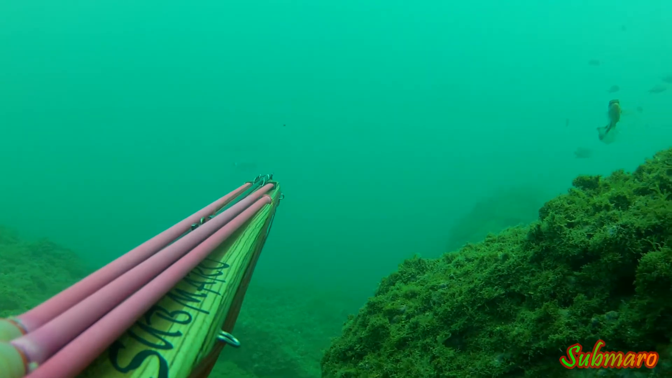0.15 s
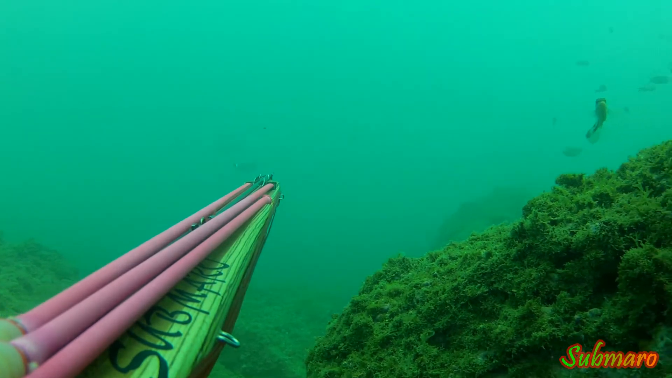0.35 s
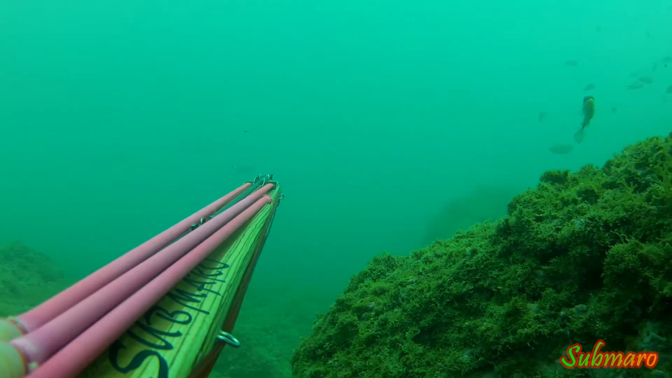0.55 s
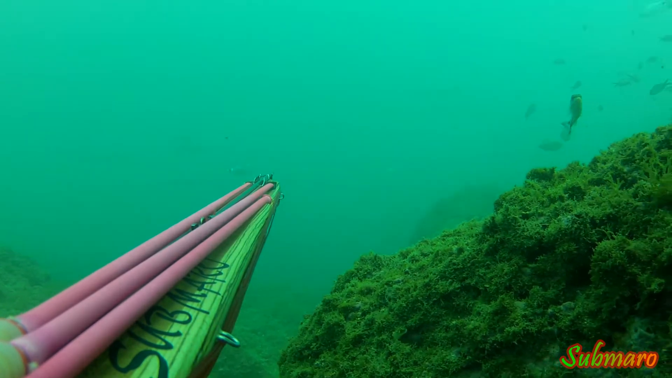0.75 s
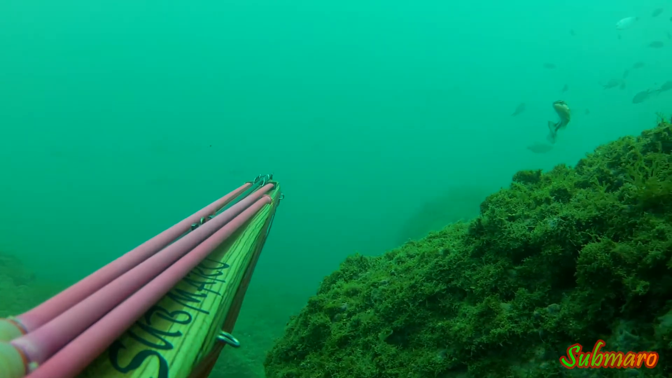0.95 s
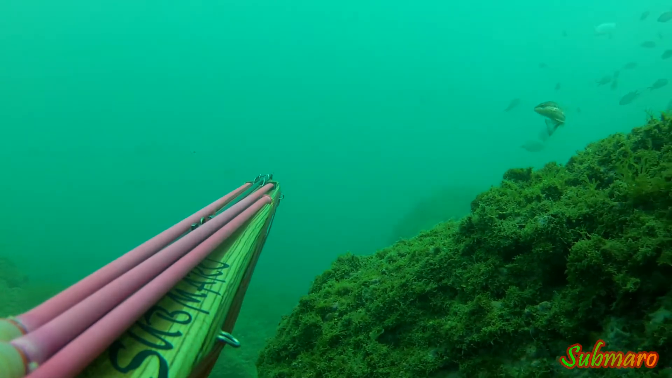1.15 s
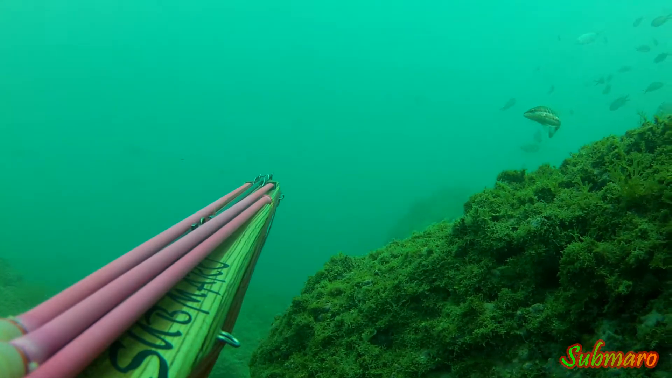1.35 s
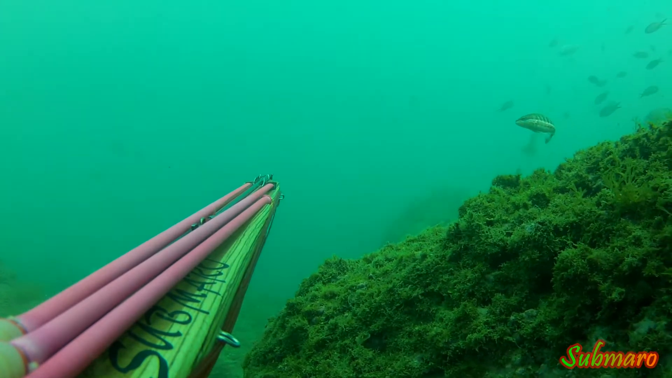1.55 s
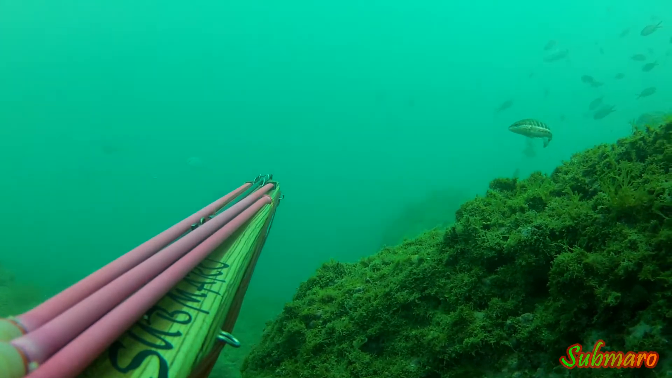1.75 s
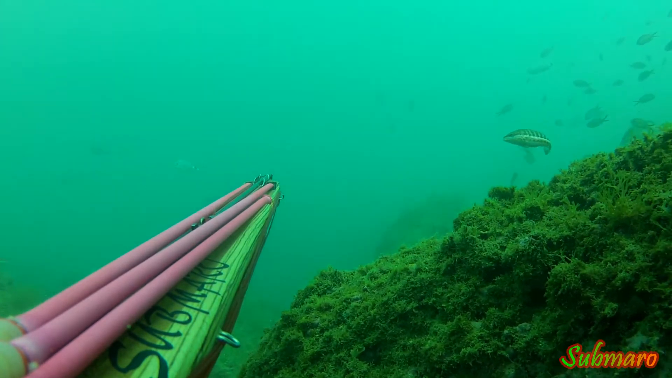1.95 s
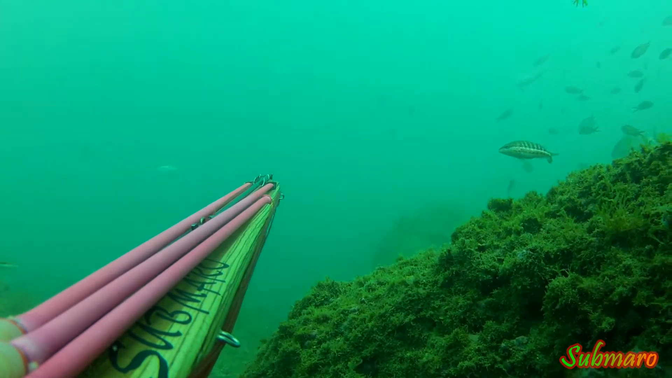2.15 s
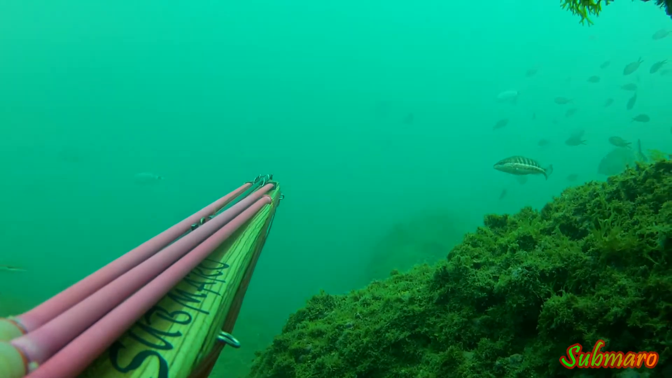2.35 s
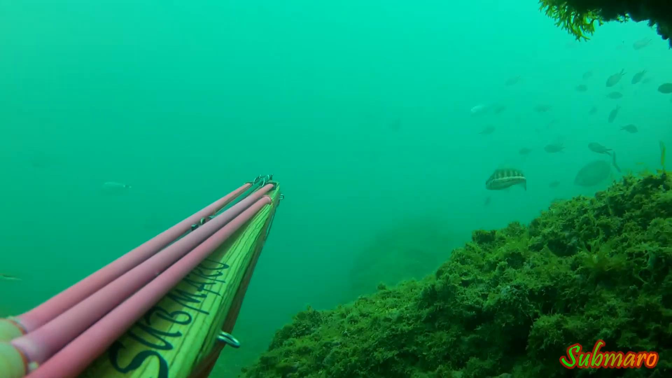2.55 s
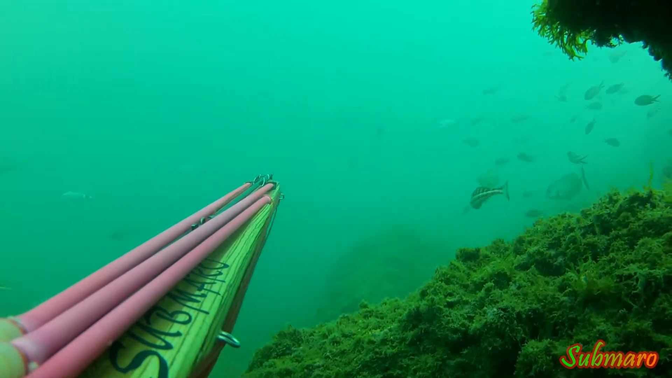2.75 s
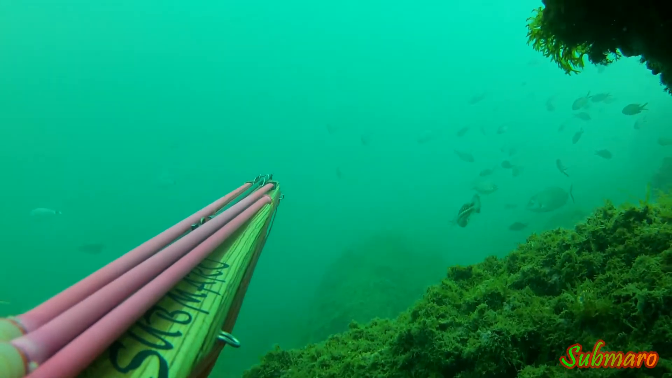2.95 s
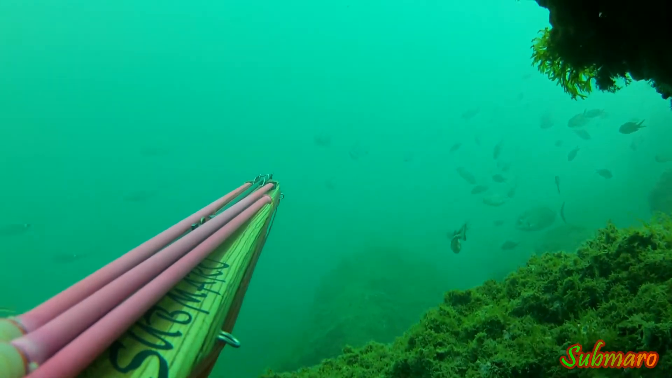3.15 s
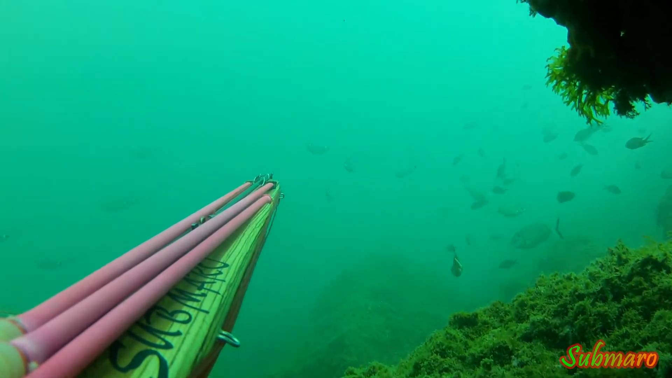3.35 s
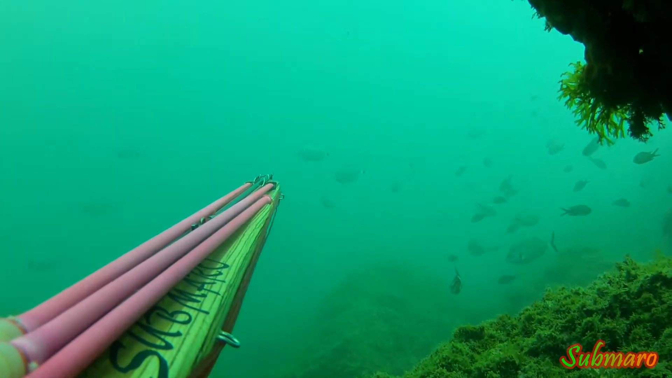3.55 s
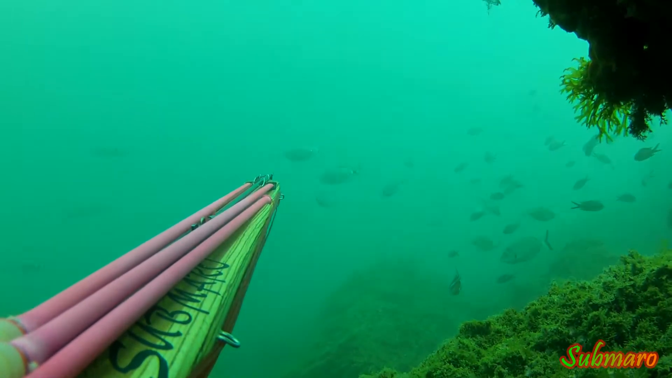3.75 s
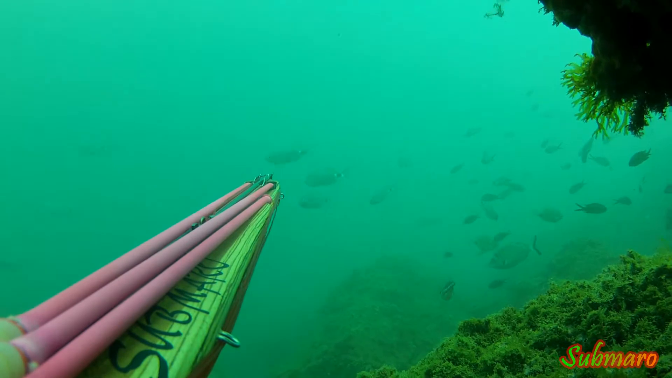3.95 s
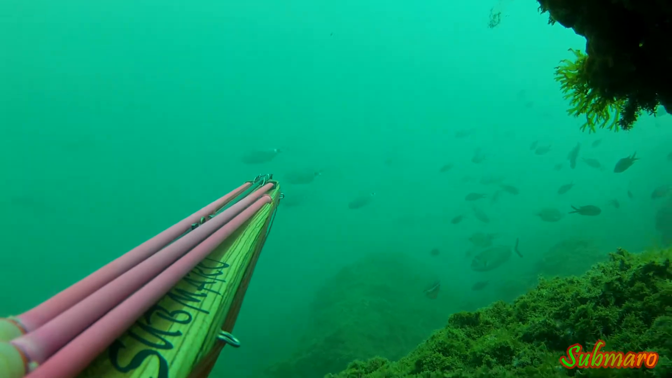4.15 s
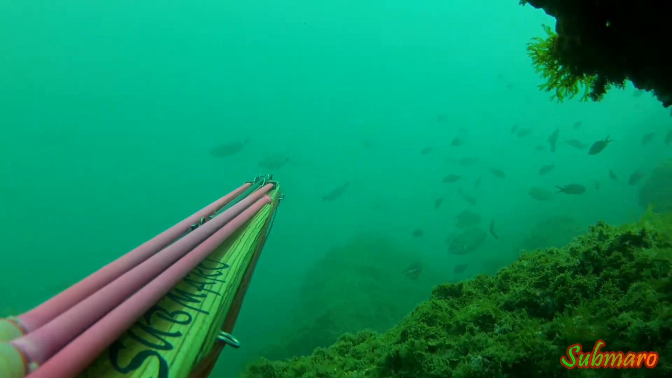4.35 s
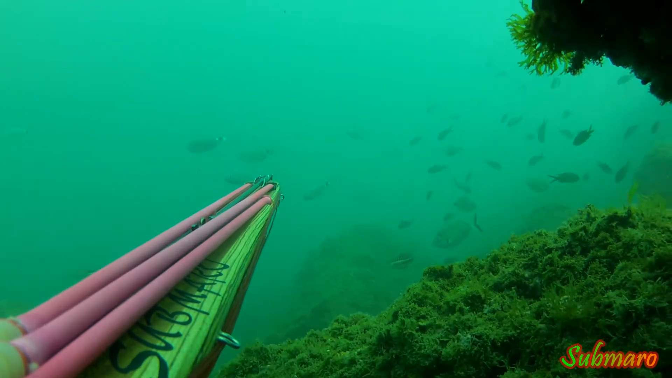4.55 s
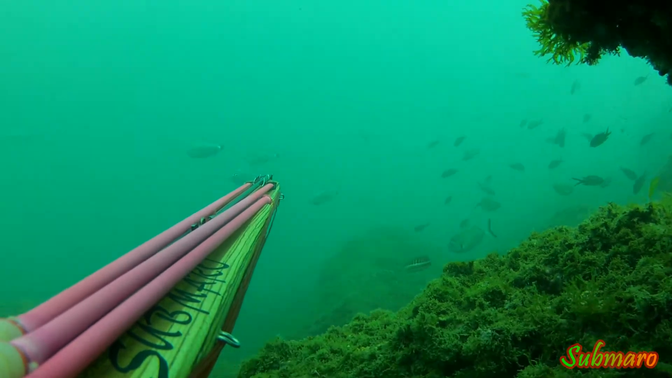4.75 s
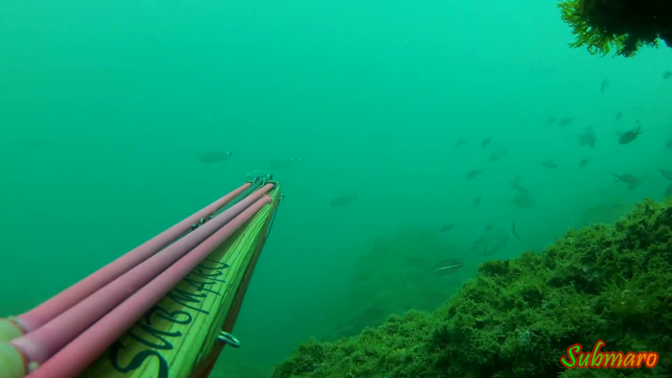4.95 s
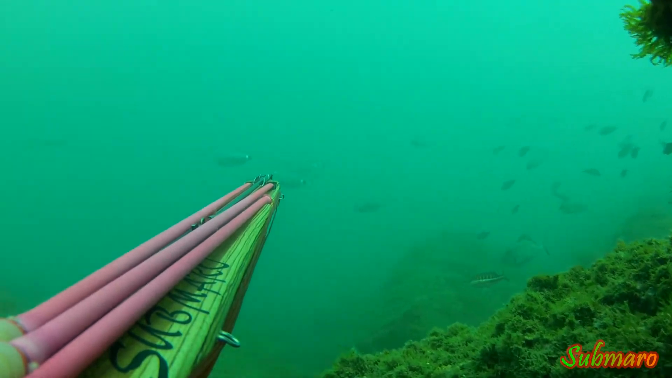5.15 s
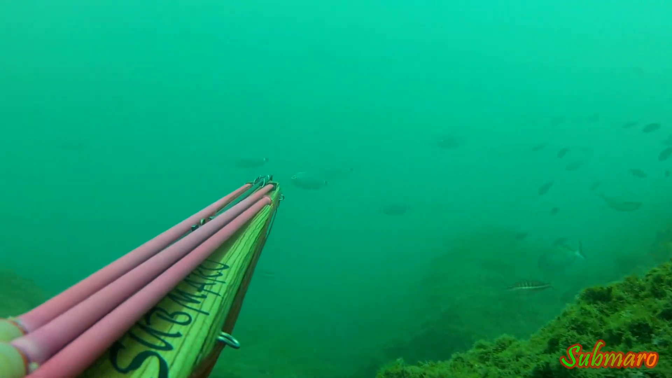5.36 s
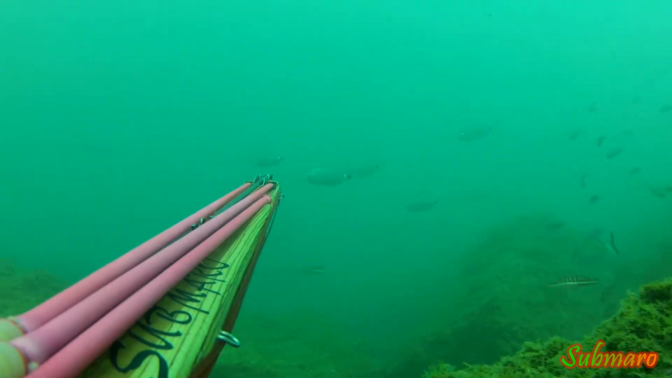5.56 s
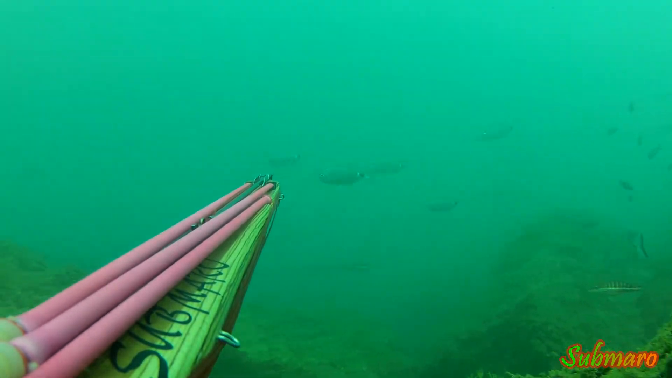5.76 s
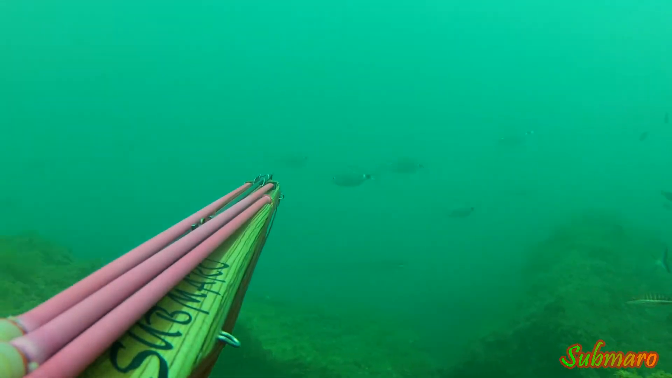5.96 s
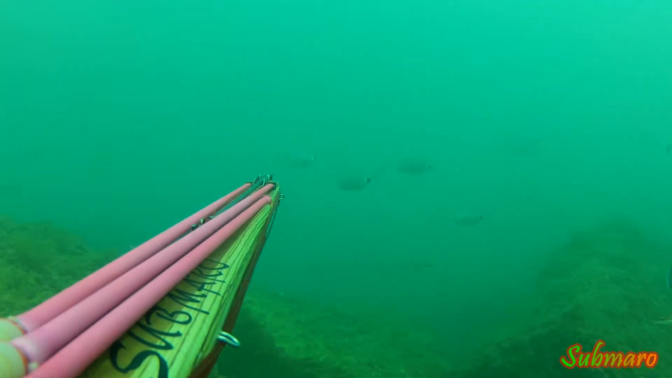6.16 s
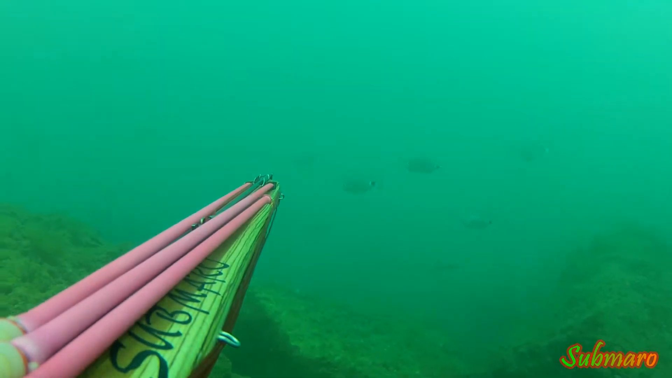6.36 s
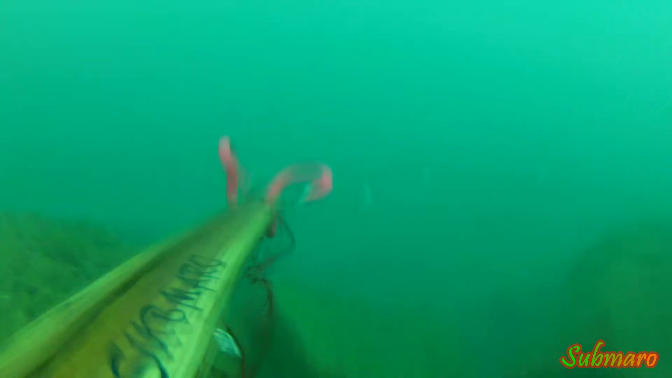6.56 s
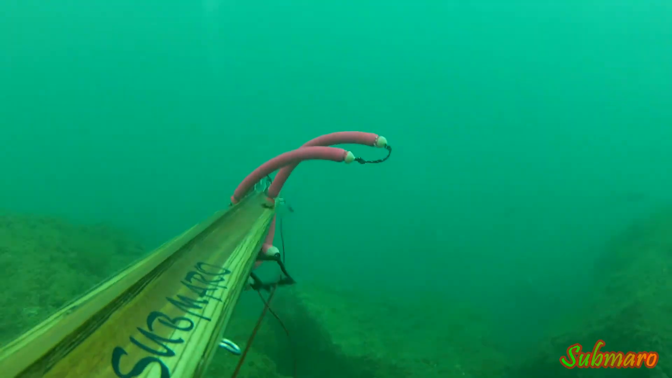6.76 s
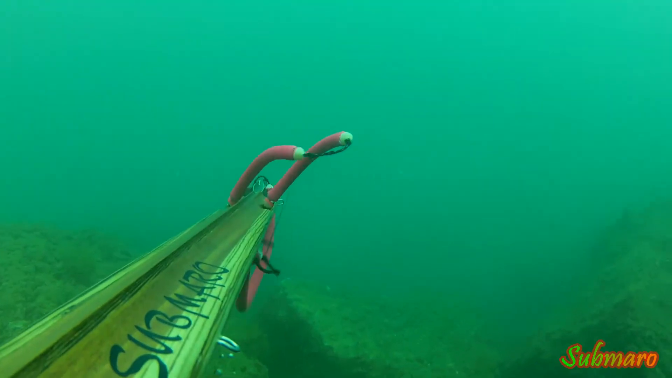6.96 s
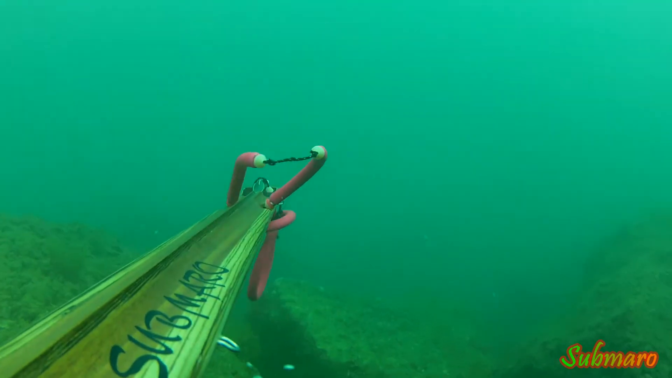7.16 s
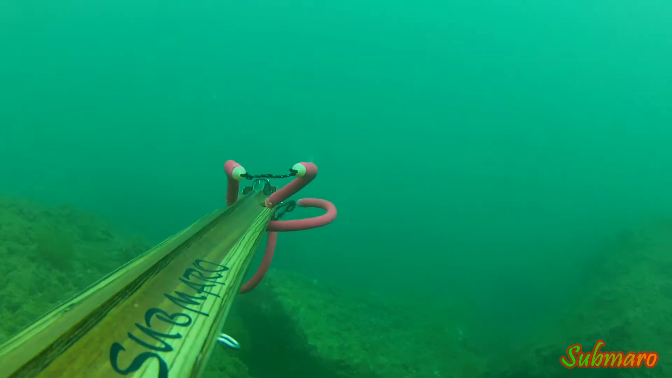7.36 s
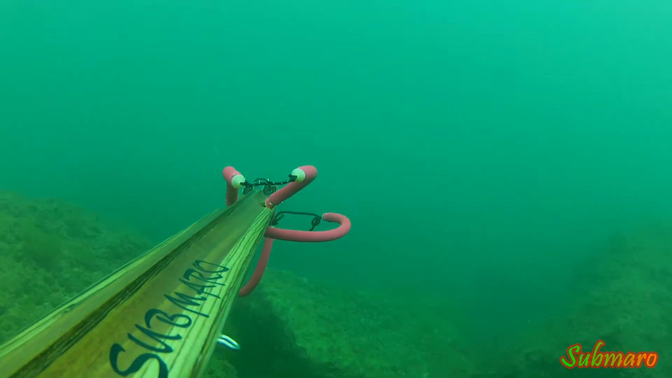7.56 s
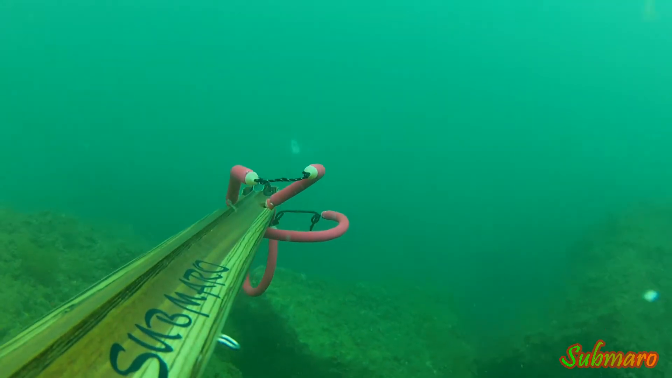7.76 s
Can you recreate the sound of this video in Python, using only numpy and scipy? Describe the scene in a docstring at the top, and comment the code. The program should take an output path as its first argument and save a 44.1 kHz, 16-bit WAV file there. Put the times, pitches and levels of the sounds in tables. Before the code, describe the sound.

A quiet underwater reef, heard through a waterproof camera housing close to a speargun. A faint dull hiss and slow low surge carry sparse, dry shrimp crackle. At about 1.9 s one very close snap cracks sharply with a tiny double edge. From 2.3 s soft hollow knocks, faint gurgling and small bubble blips touch the housing, notably around 2.3-2.7, 3.4 and 4.6 s, with weaker taps near 5.2 and 5.7 s. At 6.5 s the speargun fires: an abrupt, very loud, gritty bang with a split-second screech and deep thump. Bands and line clatter rapidly until about 6.9 s over churning water and scraping. From 6.95 to 7.25 s the housing drums and rubs, bubbles shake loose and a strong clack lands near 7.2 s. It drops away quickly, leaving a brief light rattle at 7.3 s, a low thump near 7.6 s and small ticks, bubbles and a slight shift to the end.

```python
"""Under water on a reef, a speargun is fired beside a camera in a waterproof housing.
Shrimp snap (filtered noise bursts) and the housing knocks (damped modes), softly during the wait and
strongly at the shot. The spear screeches off its rail (a noisy tone), the gun kicks, bands and line rattle
on the barrel (blows on damped modes), and churning water rubs and drums on the housing (shaped noise and
random grains). Thumps and bubbles are short swelling sines."""
import sys
import numpy as np
from scipy import signal
from scipy.fft import rfft, irfft, next_fast_len
from scipy.io import wavfile
from scipy.ndimage import uniform_filter1d

SR = 44100
rng = np.random.default_rng(int(sys.argv[2]) if len(sys.argv) > 2 else 0)


def output_pcm(signal):
    """Save a mono or channel-first signal as 16-bit PCM at the path in sys.argv[1].

    Samples are clipped to [-1, 1] before scaling.
    """
    pcm = np.clip(np.atleast_2d(signal).T, -1, 1) * 32767
    wavfile.write(sys.argv[1], SR, np.round(pcm).astype(np.int16))


N = 343980
T = np.arange(N) / SR  # time, s

# All levels are those of the dry sound, ahead of record().
# spectrum of the quiet sea's hiss: [f/Hz, relative density level/dB]
SEA_SPECTRUM = [(12, -31), (20, -1), (60, 0), (152, -3), (310, -6.5), (599, -14.5), (650, -16.5),
                (4310, -23.5), (5220, -27.5), (5990, -35.5), (6860, -26.5), (9280, -31), (10900, -36.5),
                (11900, -51.5), (14000, -53)]
SEA_DB = -62.5  # rms level of the hiss
# slow low surge, before a 3.5 dB cut and a random waver: [t/s, level/dB]
SURGE_LEVEL = [(0, -69), (1.8, -65.5), (2.4, -59.5), (3.9, -62), (5.7, -58), (7.8, -59.5)]
# spectrum of the surge: [f/Hz, gain/dB]
SURGE_SPECTRUM = [(12, -5.5), (35, 4), (120, -3.5), (230, -6.5), (400, -11), (900, -20.5), (3000, -49.5)]

# nearest snapping shrimp: [t/s, level over 10 ms/dB, favoured f/Hz, burst time/s]
NEAR_SNAPS = [(0.3219, -52.5, 1980, 0.0015), (0.781, -61, 5600, 0.0017), (0.902, -59, 5200, 0.0015),
              (1.3333, -55.5, 4200, 0.0015), (1.6673, -46.5, 1680, 0.0081), (1.7061, -54.5, 1920, 0.0022),
              (1.825, -55.5, 5370, 0.00065), (2.0676, -50, 3520, 0.00025), (2.2221, -50, 2410, 0.0047),
              (2.8485, -56.5, 3050, .0034), (3.0965, -53.5, 3030, .0008), (3.111, -51, 3480, 0.0017),
              (3.3485, -55.5, 3960, 0.00021), (3.7046, -49.5, 1540, 0.0042), (4.4283, -56.5, 2360, 0.0017),
              (4.6311, -49.5, 2100, 0.00089), (5.565, -54, 2340, 0.0037), (5.761, -57.5, 4880, 0.0011),
              (6.0213, -47, 3260, .0015)]
# spectra of a near snap, of the far snaps and of one very close crack: [f/Hz, gain/dB]
SNAP_SPECTRUM = [(100, -29), (500, -10.5), (1000, 4), (1400, -5), (2000, 2), (3300, -3), (5000, -4.5),
                 (7200, -2), (10000, -6), (11500, -23), (16000, -43.5)]
FAR_SPECTRUM = [(100, -29.5), (1000, -8.5), (2000, -1), (3500, -9), (5000, -1), (7300, -6.5), (8500, -15.5),
                (10300, -10.5), (11500, -26), (16000, -47)]
CRACK_SPECTRUM = [(100, -26.5), (500, -20.5), (780, -19), (1020, -5), (1400, -2), (2100, -3.5), (2750, 2.5),
                  (3700, 0), (4600, -11), (7200, -18.5), (8500, -8.5), (10500, -25), (12000, -43.5),
                  (14700, -12.5), (16000, -41)]
# fainter shrimp at random: level over 10 ms and its spread (dB), favoured range (Hz), burst time (s)
FAINT_SNAP_DB, FAINT_SNAP_SPREAD_DB, FAINT_SNAP_HZ, FAINT_SNAP_S = -64, 3.5, (1910, 4500), 0.0025

# damped modes of the gun and of the camera housing: [f/Hz, bandwidth/Hz, relative level/dB]
GUN_MODES = [(211, 95, 2.5), (394, 82, 1), (504, 26, 3.5), (632, 91, -3.5), (956, 119, 2), (1272, 75, -7),
             (1412, 120, -10), (1692, 148, -5.5), (1903, 180, -3), (2344, 360, -5.5), (2640, 600, -9.5),
             (3306, 510, -10.5), (4470, 1000, -21.5), (8100, 2600, -22)]
HOUSING_MODES = [(169, 40, -8.5), (213.7, 22.6, 4.5), (427, 35, -13), (628.4, 36, -4.5), (883, 52, -12),
                 (1065, 79, -16), (1525, 420, -27.5), (2200, 460, -31.5), (2960, 460, -35.5)]

# low thumps, one under the close crack, most others at the shot and gun movements:
# [t/s, peak level/dB, f/Hz, decay time/s]
LOW_THUMPS = [(1.878, -38.5, 45, 0.0086), (2.081, -45, 98, 0.0072), (6.4919, -3, 325, 0.0048),
              (6.496, -3.5, 103, 0.006), (6.53, -26, 83, 0.025), (6.559, -17, 149, 0.012),
              (6.568, -22, 60, 0.014), (6.637, -27, 86, 0.018), (6.797, -30.5, 69, 0.0086),
              (7.572, -36.5, 94, 0.0081)]
# small air bubbles: [t/s, peak level/dB, f/Hz, decay time/s]
LONE_BUBBLES = [(2.518, -49.5, 550, 0.019), (3.361, -48, 664, 0.021), (4.590, -46.5, 623, 0.02),
                (7.549, -44, 377, 0.0066), (7.753, -43, 296, 0.026)]
# knocks and glugs on the housing, soft during the wait and strong at the shot:
# [t/s, level over 10 ms/dB, favoured f/Hz, contact time/s]
HOUSING_KNOCKS = [(2.289, -41, 300, 0.0026), (2.315, -58, 600, .0048), (2.481, -51.5, 1230, 0.0035),
                  (2.588, -45, 920, 0.0093), (2.697, -51.5, 1000, 0.0065), (3.3605, -45, 790, 0.0034),
                  (4.543, -47, 1900, 0.0077), (4.555, -37, 940, 0.0021), (4.592, -45, 826, 0.012),
                  (5.225, -54.5, 393, .016), (5.650, -45.5, 398, 0.0088), (6.305, -55.5, 704, 0.0064),
                  (6.495, -8.5, 215, 0.0011), (6.559, -14.5, 221, 0.0061), (7.038, -24.5, 169, 0.014),
                  (7.093, -24, 390, .012), (7.12, -25.5, 440, .012), (7.19, -19.5, 190, 0.0058),
                  (7.218, -23, 190, 0.0045)]
# water sloshes back after a knock: delay range (s), level re the knock (dB), fading (dB/s), contact time (s)
SLOSH_DELAY_S, SLOSH_DB, SLOSH_FADE_DB_PER_S, SLOSH_CONTACT_S = (0.016, 0.14), -15, 61, 0.0079

# the diver creeps along the reef and water gurgles round the housing: [start t/s, length/s, level/dB]
CREEPING = [(2.538, 0.39, -63.5), (4.9, 0.77, -66.5)]
GURGLE_HZ = 710

# spear, bands and line strike the gun: [t/s, level over 10 ms before echoes/dB, favoured f/Hz]
GUN_STRIKES = [(6.4924, -10, 1710), (6.4971, -11, 1700), (6.518, -19, 910), (6.527, -11.5, 620),
               (6.5632, -24.5, 2100), (6.5775, -26, 1690), (6.6027, -29, 2360), (6.619, -28, 1260),
               (6.63, -30.5, 1520), (6.648, -29.5, 1400), (6.661, -30.5, 1670), (6.676, -23, 1600),
               (6.6937, -22.5, 1720), (6.7445, -19.5, 1110), (6.7733, -22.5, 910), (6.795, -27, 910),
               (6.824, -30, 1410), (6.853, -25, 1040), (6.998, -31.5, 970), (7.058, -35.5, 1350),
               (7.183, -22, 705), (7.188, -20.5, 1540), (7.189, -15, 950), (7.3083, -40, 890),
               (7.4208, -43.5, 920), (7.4989, -49.5, 2010), (7.6482, -32.5, 2900), (7.7107, -43.5, 1280),
               (7.7436, -38.5, 1540)]
CONTACT_CYCLES = 3.63  # a contact lasts this many cycles of its favoured pitch
# loose line and bands chatter: [start t/s, end t/s, central level over 10 ms before echoes/dB, central f/Hz]
CHATTER = [(6.513, 6.738, -35.5, 1490), (6.761, 6.88, -39, 1100), (7.327, 7.364, -38, 786)]
RATTLE_GAP_S, RATTLE_JITTER_S, RATTLE_SPREAD_DB, RATTLE_SPREAD_OCTAVES = 0.019, 0.006, 9.5, 0.52

# the gun recoils, is lowered, then shifts in the hand:
# [start t/s, length/s, starting level of rubbing on the housing/dB, starting level of line scraping/dB]
GUN_MOVES = [(6.498, 0.26, -40, -33), (6.959, 0.22, -30, -42), (7.73, .055, -57, -54)]
MOVE_RISE_DB_PER_S, MOVE_FALL_DB_PER_S = 551.5, 107.5
RUB_GROWTH_DB_PER_S, SCRAPE_FADE_DB_PER_S = 19, 54.5  # the grip tightens, the line goes slack

# each swing of the gun stirs up eddies: [t/s, peak level/dB]
EDDY_PEAKS = [(6.53, -26.5), (6.78, -34.5), (7.14, -37.5), (7.21, -38.5), (7.568, -48)]
EDDY_RISE_DB_PER_S, EDDY_FALL_DB_PER_S = 333, 69.5
# spectrum of turbulence: [f/Hz, gain/dB]
TURBULENCE_SPECTRUM = [(12, -9.5), (35, -0.5), (90, -5), (150, -9), (300, -15), (800, -52.5),
                       (3000, -102.5)]

# lowering the gun shakes bubbles loose: time span (s), pitch range (Hz), peak and spread (dB), cycles of decay
SHAKEN_S, SHAKEN_HZ, SHAKEN_DB, SHAKEN_SPREAD_DB, SHAKEN_CYCLES = (6.96, 7.24), (450, 1145), -31.5, 5.5, 5.4

# which parts of a sound turn into gritty treble: [f/Hz, gain/dB]
GRIT_SPECTRUM = [(50, -39.5), (210, -26.5), (500, -19.5), (1000, -13.5), (2000, -7.5), (3200, -1.5),
                 (4500, -18), (7000, -23), (9000, -49.5)]
GRIT_HZ, EDGE_HZ = 12000, 15100  # centre of the mirrored treble; upper edge of the band


def amp(db):
    """Decibel law: 20 dB is a tenfold amplitude."""
    return 10 ** (np.asarray(db) / 20)


def unit(x):
    """Normalisation to a root-mean-square value of 1."""
    return x / np.sqrt(np.mean(x ** 2) + 1e-20)


def add(mix, s, sound):
    """Superposition: adds a sound in place from s seconds."""
    part = mix[round(s * SR):][:len(sound)]
    part += sound[:len(part)]


def follow(rows, axis):
    """Envelope: linear interpolation of one dB column, as a gain for every sample."""
    rows = np.array(rows)
    return amp(np.interp(T, rows[:, 0], rows[:, axis], left=-120))


def colour(x, points):
    """Minimum-phase filtering: the Hilbert transform of the log gain gives a causal phase."""
    size = next_fast_len(2 * len(x))
    hz, db = np.transpose(points)
    log_hz = np.log(abs(np.fft.fftfreq(size, 1 / SR)) + 1)
    log_gain = np.log(amp(np.interp(log_hz, np.log(hz), db)))
    response = np.exp(np.conj(signal.hilbert(log_gain)))
    return np.fft.ifft(np.fft.fft(x, size) * response).real[:len(x)]


def ring(x, modes, size=4096):
    """Modal superposition: a force convolved with a body's exponentially damped modes."""
    t = np.arange(size) / SR
    body = np.zeros(size)
    for k, (hz, width, db) in enumerate(modes):
        decay = np.exp(-np.pi * width * t)
        # neighbouring modes have opposite sign
        body += (-1) ** k * amp(db) * width * decay * np.sin(2 * np.pi * hz * t)
    return signal.oaconvolve(x, body)[:len(x)]


def burst(length, size=8192):
    """Broadband impact: a short chattering force, its spectrum flattened before a final fade."""
    u = np.arange(size) / SR / max(length, 1e-4)
    shape = (1 - np.exp(-4 * u)) * np.exp(-u)
    spectrum = rfft(shape * rng.standard_normal(size))
    flat = irfft(spectrum / (abs(spectrum) + 1e-12))
    return flat * np.sqrt(shape)


def at_level(x, db):
    """Energy normalisation: gives a short sound the energy of 10 ms at this rms level."""
    return amp(db) * x / np.sqrt(np.sum(x ** 2) * 100 / SR)


def scatter(x, tail_db, decay):
    """Multiple scattering: nearby surfaces add a dense, exponentially dying cloud of echoes."""
    cloud = rng.standard_normal(len(x)) * np.exp(-np.arange(len(x)) / SR / decay)
    echoes = signal.fftconvolve(x, cloud / np.linalg.norm(cloud))[:len(x)]
    return x + amp(tail_db) * echoes


def favour(force, hz, focus):
    """Resonant weighting: a peak filter of quality factor focus favours a force near hz."""
    return signal.lfilter(*signal.iirpeak(hz, focus, fs=SR), force)


def blow(modes, db, hz, length, focus):
    """Impact excitation: the hardness of the contact favours the modes near hz."""
    return at_level(ring(favour(burst(length), hz, focus), modes), db)


def grains(per_s, spread_db):
    """Shot noise: random clicks of either sign, most small and a few large."""
    hits = rng.random(N) < per_s / SR
    signs = rng.choice([-1, 1], N)
    return hits * signs * amp(spread_db * np.minimum(rng.exponential(1, N), 4))


def waver(per_s, depth_db):
    """Random amplitude modulation: a gain redrawn per_s times a second, interpolated between."""
    return amp(depth_db * np.interp(T * per_s, np.arange(N), rng.standard_normal(N)))


def swing(db, hz, decay):
    """Damped oscillation: a few cycles that swell and die away, strongest at half the decay time."""
    t = T[:SR // 6]
    envelope = 2 * t / decay * np.exp(1 - 2 * t / decay)
    return amp(db) * np.sin(2 * np.pi * hz * t) * envelope


def swell(start, hold, db, rise_db_per_s, fall_db_per_s, drift_db_per_s):
    """Exponential growth and decay: a gain rises to db at start, drifts while held, then falls."""
    t = T - start
    rise = rise_db_per_s * np.minimum(t, 0)
    drift = drift_db_per_s * np.clip(t, 0, hold)
    fall = fall_db_per_s * np.maximum(t - hold, 0)
    return amp(np.maximum(db + rise + drift - fall, -160))


def sea():
    """Ambient noise: a steady spectrally shaped hiss and a slow, wavering low surge."""
    hiss = amp(SEA_DB) * unit(colour(rng.standard_normal(N), SEA_SPECTRUM))
    low = unit(colour(rng.standard_normal(N), SURGE_SPECTRUM))
    surge = amp(-3.5) * follow(SURGE_LEVEL, axis=1) * waver(per_s=5, depth_db=2.0) * low
    return hiss + surge


def snap(db, hz, length):
    """Impulsive source with reef scattering: one claw snap, favouring its own pitch."""
    click = favour(burst(length), hz, 1.1)
    return at_level(colour(scatter(click, tail_db=-3.0, decay=0.0089), SNAP_SPECTRUM), db)


def shrimp():
    """Superposed impulses: single near and faint snaps over the shot noise of the far reef."""
    crackle = scatter(grains(per_s=32, spread_db=6.5), tail_db=9.0, decay=0.004)
    out = amp(-73.0) * unit(colour(crackle, FAR_SPECTRUM))
    for s, db, hz, length in NEAR_SNAPS:
        add(out, s, snap(db, hz, length))
    for when, strength, pitch in rng.random(size=(22, 3)):
        db = FAINT_SNAP_DB + FAINT_SNAP_SPREAD_DB * (2 * strength - 1)
        hz = np.interp(pitch, (0, 1), FAINT_SNAP_HZ)
        add(out, when * T[-1], snap(db, hz, FAINT_SNAP_S))
    return out


def crack():
    """Discrete reflection: one very close snap, its echo a millisecond later, each with scattering."""
    out = np.zeros(N)
    click = burst(0.0006)
    for s, db in [(1.8752, -20), (1.8762, -18)]:
        echoing = scatter(click, tail_db=-12.5, decay=0.003)
        add(out, s, at_level(colour(echoing, CRACK_SPECTRUM), db))
    return out


def housing():
    """Modal response and damped oscillation: knocks ring its modes; low thumps and bubbles swell and die."""
    out = np.zeros(N)
    for s, db, hz, decay in LOW_THUMPS + LONE_BUBBLES:
        add(out, s, swing(db, hz, decay))
    for s, db, hz, length in HOUSING_KNOCKS:
        add(out, s, blow(HOUSING_MODES, db, hz, length, focus=0.84))
        # weaker glugs as the water sloshes back
        for delay in np.interp(rng.random(size=2), (0, 1), SLOSH_DELAY_S):
            slosh_db = db + SLOSH_DB - SLOSH_FADE_DB_PER_S * delay
            add(out, s + delay, blow(HOUSING_MODES, slosh_db, hz, SLOSH_CONTACT_S, focus=0.69))
    return out


def gurgle():
    """Clustered excitation: wavering grains ring the housing in faint glugs while the diver moves."""
    moving = sum(swell(s, length, db, EDDY_RISE_DB_PER_S, EDDY_FALL_DB_PER_S, 0) for s, length, db in CREEPING)
    glugs = grains(per_s=760, spread_db=2.0) * waver(per_s=17, depth_db=10)
    return moving * unit(ring(favour(glugs, GURGLE_HZ, 1.1), HOUSING_MODES))


def clack(db, hz):
    """Modal impact with close echoes: one strike on the gun, longer in contact when lower in pitch."""
    strike = blow(GUN_MODES, db, hz, CONTACT_CYCLES / hz, focus=1.24)
    return scatter(strike, tail_db=-9.0, decay=0.0055)


def gun():
    """Friction tone, then impacts: the spear screeches off the rail; bands and line clatter."""
    out = np.zeros(N)
    t = np.arange(round(0.0078 * SR)) / SR
    screech = np.sin(2 * np.pi * 1450 * t) + amp(-12.5) * rng.standard_normal(len(t))
    add(out, 6.4908, screech * signal.windows.tukey(len(t), 0.5))
    for s, db, hz in GUN_STRIKES:
        add(out, s, clack(db, hz))
    return out


def churn():
    """Friction and turbulence: slips drum on the housing, line scrapes the gun, eddies buffet."""
    grip, drag, stir = np.zeros((3, N))
    for s, length, rub_db, scrape_db in GUN_MOVES:
        grip += swell(s, length, rub_db, MOVE_RISE_DB_PER_S, MOVE_FALL_DB_PER_S, RUB_GROWTH_DB_PER_S)
        drag += swell(s, length, scrape_db, MOVE_RISE_DB_PER_S, MOVE_FALL_DB_PER_S, -SCRAPE_FADE_DB_PER_S)
    for s, db in EDDY_PEAKS:
        stir += swell(s, 0, db, EDDY_RISE_DB_PER_S, EDDY_FALL_DB_PER_S, 0)
    slips = grains(per_s=900, spread_db=2) * waver(per_s=35, depth_db=5)
    rub = grip * unit(ring(slips, HOUSING_MODES))
    scraping = ring(grains(per_s=790, spread_db=3), GUN_MODES) * waver(per_s=110, depth_db=3)
    scrape = drag * unit(scraping)
    eddies = stir * unit(colour(rng.standard_normal(N), TURBULENCE_SPECTRUM))
    return rub + scrape + eddies


def rattle():
    """Repeated impact: runs of light clacks, uneven in time, strength and colour."""
    out = np.zeros(N)
    for start, end, db, hz in CHATTER:
        for s in np.arange(start, end, RATTLE_GAP_S):
            late, strength, pitch = rng.uniform(-1, 1, size=3)
            light_clack = clack(db + RATTLE_SPREAD_DB * strength, hz * 2 ** (RATTLE_SPREAD_OCTAVES * pitch))
            add(out, s + RATTLE_JITTER_S * late, light_clack)
    return out


def shaken_bubbles():
    """Bubble resonance: each of a cloud of bubbles rings briefly at the pitch of its size."""
    out = np.zeros(N)
    for when, bore, strength in rng.random(size=(18, 3)):
        hz = np.exp(np.interp(bore, (0, 1), np.log(SHAKEN_HZ)))
        db = SHAKEN_DB + SHAKEN_SPREAD_DB * (2 * strength - 1)
        add(out, np.interp(when, (0, 1), SHAKEN_S), swing(db, hz, SHAKEN_CYCLES / hz))
    return out


def scene():
    """Linear superposition: all the sounds add at one microphone."""
    surroundings = sea() + shrimp() + crack() + housing() + gurgle()
    shot = gun() + churn() + rattle() + shaken_bubbles()
    return (surroundings + shot)[None]


def record(dry):
    """Saturation and modulation: peaks flatten, loud sounds carry gritty treble, 6 kHz is weak."""
    ceiling = 0.55
    x = dry[0] / (1 + (dry[0] / ceiling) ** 6) ** (1 / 6)
    power = abs(uniform_filter1d(x ** 2, size=400))
    loudness_gate = power / (power + amp(-54.5) ** 2)
    # the product with a cosine puts mirrored sidebands about GRIT_HZ
    grit = colour(x, GRIT_SPECTRUM) * np.cos(2 * np.pi * GRIT_HZ * T) * loudness_gate
    grit = signal.lfilter(*signal.butter(5, 13900, fs=SR), grit)
    x = signal.lfilter(*signal.iirnotch(6000, 6.0, fs=SR), x + amp(-0.37) * grit)
    band_limit = signal.firwin(127, EDGE_HZ, window=("kaiser", 9), fs=SR)
    return signal.oaconvolve(x, band_limit, "same")[None]


dry = scene()
out = record(dry)
output_pcm(out)
```